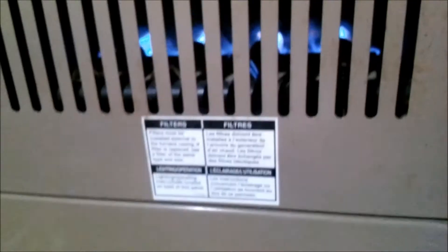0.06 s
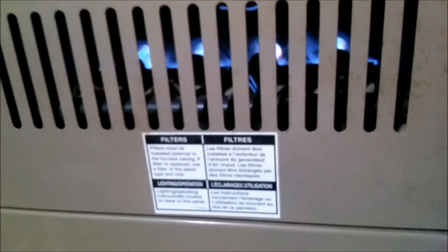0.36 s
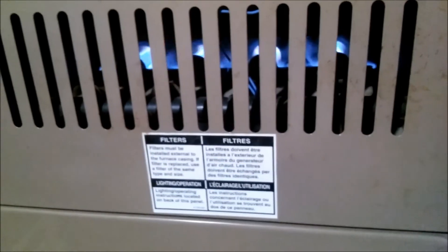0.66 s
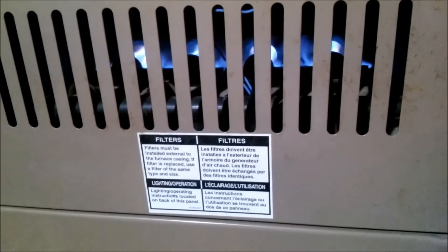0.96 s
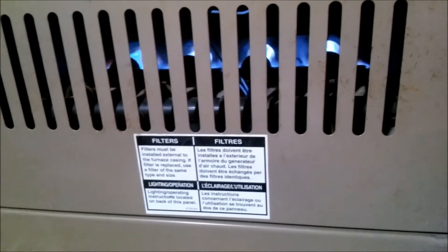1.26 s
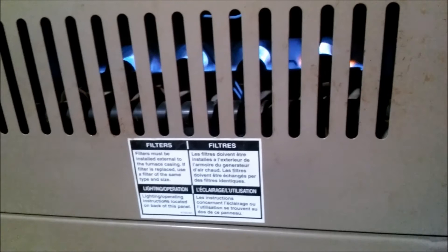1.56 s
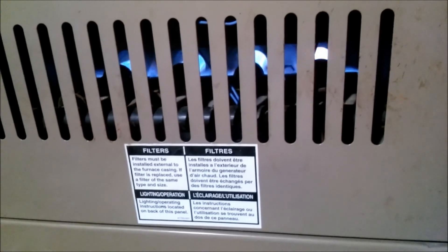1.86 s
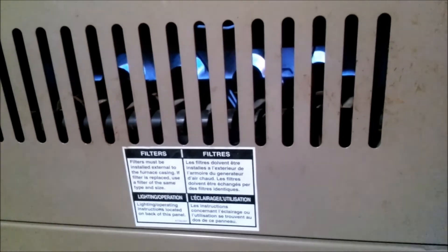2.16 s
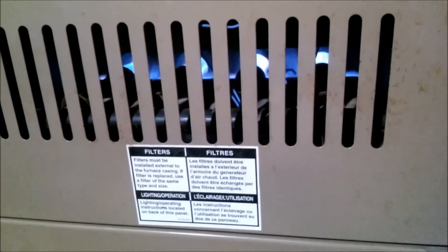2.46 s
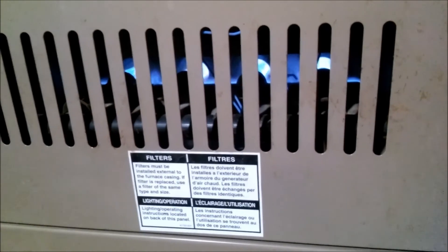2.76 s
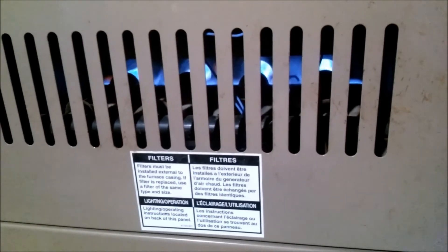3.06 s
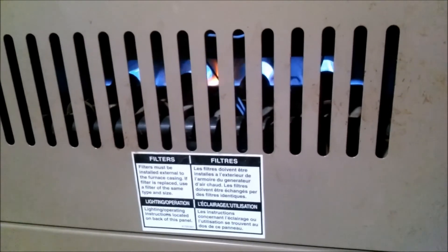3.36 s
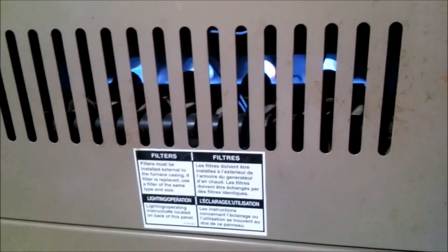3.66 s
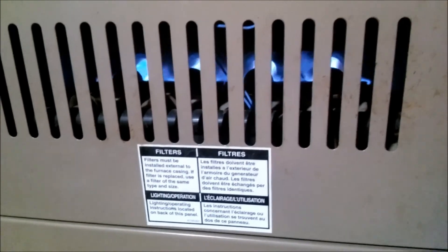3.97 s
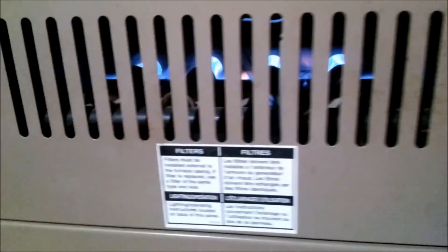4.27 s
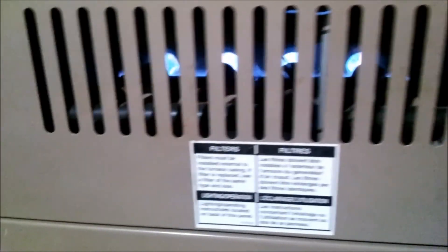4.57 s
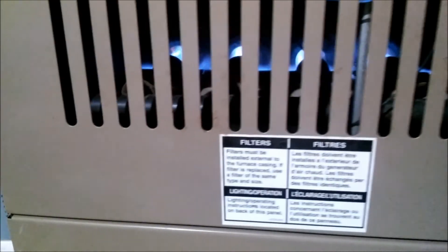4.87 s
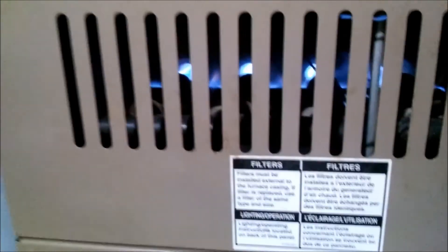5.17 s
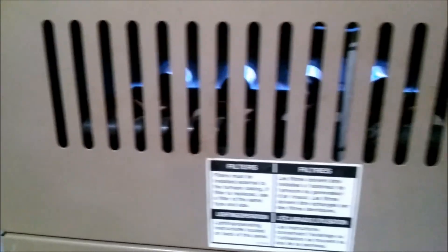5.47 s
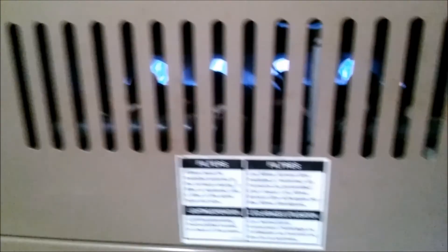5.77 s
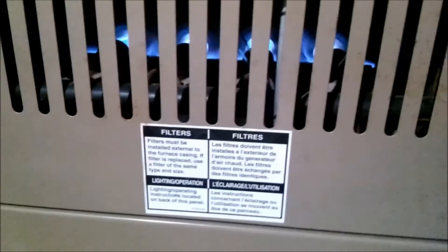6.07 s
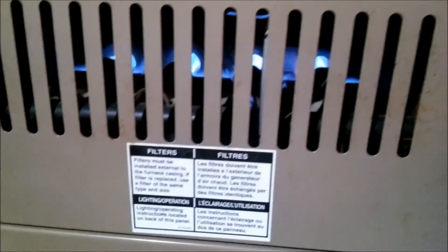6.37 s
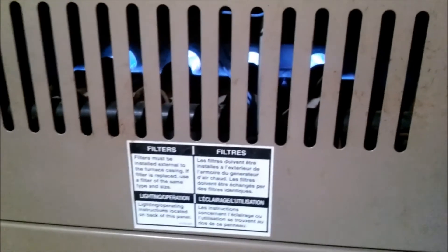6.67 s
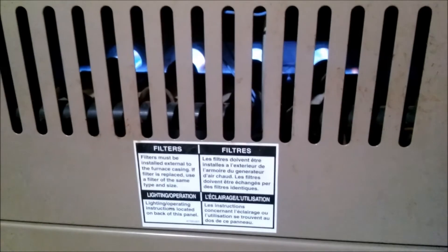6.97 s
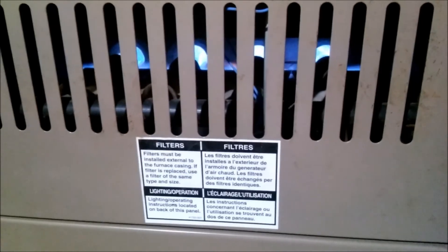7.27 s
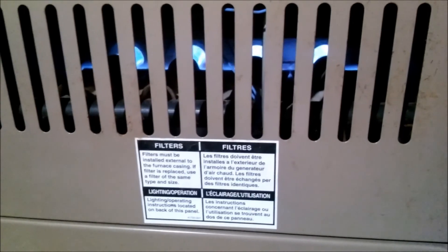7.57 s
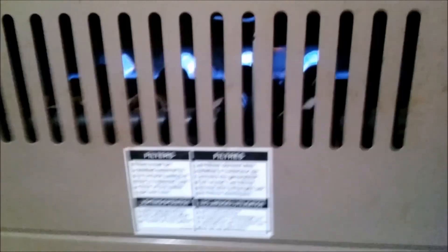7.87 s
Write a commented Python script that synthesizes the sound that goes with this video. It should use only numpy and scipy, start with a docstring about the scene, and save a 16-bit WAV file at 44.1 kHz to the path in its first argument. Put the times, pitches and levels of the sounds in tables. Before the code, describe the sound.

A gas furnace burns close by, its flames rumbling and surging under a humming, whining fan and hissing jets.

```python
"""The sound opens abruptly, loud and full, with broadband noise, then soon thins.
A gas furnace burns close by, behind a louvred steel door. The flames rumble and surge, the gas jets
hiss, air rings the cabinet's resonances, and the draught fan's induction motor hums, whines and throbs
as the listener shifts about. After a brief sizzle and faint clicks a thin whistle stands out;
with two sharp clicks the sound stops."""
import sys
import numpy as np
from scipy import signal
from scipy.fft import rfft, irfft, next_fast_len
from scipy.io import wavfile
from scipy.ndimage import uniform_filter1d

SR = 44100
rng = np.random.default_rng(int(sys.argv[2]) if len(sys.argv) > 2 else 0)


def wrap_up_sound(samples):
    """Save the sound to the file named by the first command line argument, as 16-bit audio."""
    columns = np.atleast_2d(samples).T
    # keep every value between -1 and 1, then stretch to whole-number steps
    tamed = np.clip(columns, -1, 1)
    steps = np.round(tamed * 32767).astype(np.int16)
    wavfile.write(sys.argv[1], SR, steps)


N = 353020
TIME = np.arange(N) / SR
SIZE = next_fast_len(N, True)
FREQ = np.maximum(np.arange(SIZE // 2 + 1) * SR / SIZE, 1)

SHAFT_HZ, PULL_HZ = 55.585, 120   # the field pulls on the motor at twice the mains frequency
OPENING_END_S, OPENING_FADE_S = 1.182, 0.12   # the fuller opening falls back
TAKEOVER_S, TAKEOVER_RISE_S = 5.76, 0.21   # the thin whistle takes over from whine and hiss

# Spectral shapes of the noises: frequency_hz, relative_db
OPENING_SPECTRUM = [(150, -25), (260, -1), (380, 11), (560, -14), (1100, 3), (1800, -1), (3200, -2.5),
                    (3800, -7.5), (5200, -9), (6400, -1.5), (7200, -19.5), (10000, -29.5)]
RUMBLE_SPECTRUM = [(20, -41), (36, -36.5), (46, -20.5), (56, -6.5), (66, 1.5), (76, 12.5), (88, 5),
                   (108, 14), (130, 10), (155, -7), (200, -34)]
ROAR_SPECTRUM = [(120, -20), (167, -1.5), (200, -3.5), (240, 3), (310, -3.5), (370, -18), (600, -36.5)]
DRAUGHT_SPECTRUM = [(330, -3), (400, -1), (600, -2.5), (850, 1.5), (1000, -11.5), (1150, -15), (1750, -13),
                    (2700, -14), (3200, -15), (3550, -23), (5000, -22)]
JET_SPECTRUM = [(1200, -1.5), (3000, -4), (3600, -6), (4300, -5), (5300, -15), (6000, 2.5), (6500, 8.5),
                (7200, -1), (7800, 3.5), (8500, -4.5), (9400, -2.5), (10300, -11), (11000, -30)]
JET_TOP_SPECTRUM = [(9000, -4), (10200, 1.5), (11000, 2), (11700, 5), (12600, -0.5), (14000, -2),
                    (15700, -2)]
SIZZLE_SPECTRUM = [(3900, -19), (4250, 5), (4700, -9), (5400, 0), (5950, -1), (6200, -16), (7000, -16),
                   (7600, -2), (8600, -18), (9400, -1), (9900, -24)]
CLICK_SPECTRUM = [(300, -12), (2000, 5), (4800, 9), (7000, 0), (12000, -3), (15000, -3.5)]

# Strength of the fire between surges: time_s, relative_db
FIRE_STRENGTH = [(1.4, -37), (1.75, -38.5), (2.3, -40.5), (2.55, -40), (3.45, -37.5), (4.0, -32.5),
                 (4.6, -35), (5.35, -33), (5.9, -34.5), (6.2, -35), (6.8, -34.5), (7.15, -39.5), (7.6, -35)]
# Surges of the flames: time_s, relative_peak_db
FLAME_SURGES = [(1.719, -28), (2.443, -24.5), (2.612, -23.5), (2.801, -23.5), (2.965, -24.5), (3.224, -28),
                (3.549, -27.5), (3.734, -28), (3.837, -26), (4.42, -24.5), (4.643, -29), (4.873, -25),
                (5.292, -24.5), (6.111, -20.5), (7.4, -22.5), (7.6, -23.5)]
# Harmonics of the fan's hum: shaft_multiple, rms_db
SHAFT_HARMONICS = [(3, -52.5), (5, -54), (6, -50), (7, -60), (8, -67.5), (9, -64), (10, -61.5), (11, -58.5),
                   (15, -61), (16, -59.5), (19, -68), (20, -75)]
# Tones lying PULL_HZ above a shaft harmonic: shaft_multiple, rms_db
SIDEBANDS = [(13, -66.5), (15, -68), (16, -60.5), (17, -62.5), (18, -77.5), (19, -70.5)]
# Panel modes in the whine: centre_hz, width_hz, scrape_db, clean_db, throb_depth, throb_delay_s, side_db
PANEL_MODES = [(2015, 220, 3, -7, 0.069, 0, -11), (2084, 85, 1, 0, 0.55, 0.017, -9),
               (2239, 97, -2.5, -14.5, .9, -0.0089, 6.5), (2280, 82, -7, -10.5, 1.1, -0.013, 11),
               (2378, 68, -9.5, -19, 1.2, 0.011, 9.5), (2400, 77, -26, -17, 1.8, 0.0013, 15.5),
               (2551, 92, -13.5, -14.5, 1.6, -0.002, 18.5), (2610, 64, -7, -6, 0.79, 0.00041, 2)]
# Strength of the draught: time_s, relative_db
DRAUGHT_STRENGTH = [(1.4, -44.5), (2.1, -45), (2.55, -45), (3.1, -44), (3.35, -40), (4.05, -40.5),
                    (4.3, -41.5), (5.0, -39), (5.3, -38.5), (5.85, -42.5), (6.2, -42), (6.5, -43.5),
                    (6.9, -42), (7.2, -43.5), (7.45, -41.5), (7.85, -41.5)]
# Peaks and dips set by the cabinet's hollows: centre_hz, width_hz, gain_db
CABINET_RESPONSE = [(363, 38, -11.5), (415, 24, 8.5), (507, 82, -5.5), (600, 50, 6), (686, 38, -6),
                    (790, 87, 1.5), (942, 56, -16)]
# The four whistling resonances: centre_hz, width_hz
WHISTLE_MODES = [(1480, 140), (2930, 190), (4560, 420), (5950, 420)]
# Resonances that rise with the third whistle: centre_hz, width_hz, gain_db
COMPANION_MODES = [(3150, 130, -15.5), (3270, 84, -13.5), (7760, 920, -24.5), (9630, 980, -32)]
# Jet noise that gets past the louvres: time_s, relative_db
JET_TRANSMISSION = [(0.6, -65), (4.15, -64), (4.37, -72.5), (5.15, -75.5), (5.27, -65.5), (5.75, -68.5),
                    (5.79, -62), (6.03, -68), (7.8, -73.5)]
# Spits of the jets: centre_s, half_width_s, rise_db
JET_SPITS = [(5.812, 0.069, 2.5), (7.63, .06, 13)]
# Small dry clicks: start_s, relative_db
DRY_CLICKS = [(5.249, -39), (5.782, -31), (7.862, -36), (7.883, -12.5), (7.889, -11)]
# The listener's shift towards the cabinet's side: time_s, side_share
LISTENER_SHIFT = [(3.3, 0.12), (4.25, 0.28), (4.6, 0.3), (5.0, 0.95), (6.2, 0.82), (6.6, .55), (7.8, 0.2)]
# Level rules of the layers: usual_db, control_share, opening_db, side_db, step_db, trend_db_per_s
RUMBLE_RULE = (-39, 1, 9.5, 2, 1.5, 0)
ROAR_RULE = (-40.5, 0.64, 9.5, -1, 0, -0.5)
BLADE_RULE = (-49, 1.07, 9, 1.5, -0.5, -1.5)
WHINE_RULE = (-45.5, 0.54, 9, 3.5, -11, 3.3)
DRAUGHT_RULE = (-44.5, 1.19, 8, 1, 1, 0)
WHISTLE_RULES = [(-52.5, 0.6, 3, -5, -7.5, 0), (-54, 1.2, 12, 0, 13, -4.5), (-61, .6, 15, 3, 17.5, -.5),
                 (-55.5, 0.26, 8.3, 6.5, -13, 5)]   # one row a whistle, lowest first
HISS_RULE = (-51.5, 0.6, -0.5, 0.5, -4.5, -4.5)


def from_db(db):
    """Amplitude grows tenfold for every 20 dB."""
    return 10 ** (np.asarray(db) / 20)


def unit_rms(x):
    """Normalisation to unit mean power."""
    return x / np.sqrt(np.mean(x ** 2) + 1e-20)


def curve(points):
    """Linear interpolation of a control over time."""
    return np.interp(TIME, *np.transpose(points))


def swing(points):
    """Deviation of a level curve from its mean, in dB."""
    db = curve(points)
    return db - db.mean()


def colour(points):
    """Band-pass response through the points, falling 24 dB an octave beyond its ends."""
    hz, db = np.transpose(points)
    skirts = np.minimum(FREQ / hz[0], 1) * np.minimum(hz[-1] / FREQ, 1)
    return from_db(np.interp(np.log(FREQ), np.log(hz), db)) * skirts ** 4


def resonance(hz, width_hz):
    """Lorentzian peak of height 1, with its width taken at half height."""
    return 1 / (1 + (2 * (FREQ - hz) / width_hz) ** 2)


def noise(response):
    """Spectral shaping of white noise, at rms 1."""
    spectrum = rfft(rng.standard_normal(SIZE)) * response
    return unit_rms(irfft(spectrum, SIZE)[:N])


def drift(corner_hz, count=4096):
    """Random fluctuation of rms 1: noise low-passed at corner_hz."""
    hz = np.arange(count // 2 + 1) * SR / N
    slow = irfft(rfft(rng.standard_normal(count)) / (1 + (hz / corner_hz) ** 2))
    return np.interp(np.arange(N) * count / N, np.arange(count), unit_rms(slow))


def evened(x, span_s):
    """Division by the running rms removes slow swells and leaves the fast grain."""
    return x / np.sqrt(uniform_filter1d(x ** 2, int(span_s * SR)) + 1e-9)


def tone(cycles, rms_db):
    """Simple harmonic motion with a random starting phase."""
    return np.sqrt(2) * from_db(rms_db) * np.sin(2 * np.pi * (cycles + rng.random()))


def level(rule, control_db):
    """Gains add in dB: a layer's control, the fuller opening, the listener's shift and the takeover."""
    usual_db, share, opening_db, side_db, step_db, trend_db_per_s = rule
    side = curve(LISTENER_SHIFT)
    opening = 1 - np.clip((TIME - OPENING_END_S) / OPENING_FADE_S, 0, 1)
    takeover = np.clip((TIME - TAKEOVER_S) / TAKEOVER_RISE_S, 0, 1)
    late_db = step_db + trend_db_per_s * (TIME - TAKEOVER_S)
    return usual_db + share * control_db + opening_db * opening + side_db * side + late_db * takeover


def opening_noise(level_db=-37, fade_s=(1.2, 1.414)):
    """Broadband noise fills out the opening, then fades linearly."""
    return noise(colour(OPENING_SPECTRUM)) * from_db(level_db) * np.interp(TIME, fade_s, [1, 0])


def flames(rumble_surge_db=-5.5, roar_surge_db=-15, flutter_hz=14, lowest_hz=36):
    """Combustion noise: a low rumble and a roar above it surge and flutter with the flame fronts."""
    fire_db, surge = swing(FIRE_STRENGTH), surge_envelope()
    rumble_db = level(RUMBLE_RULE, fire_db) + 2.5 * drift(flutter_hz)
    roar_db = level(ROAR_RULE, fire_db) + 1.5 * drift(flutter_hz)
    # steady burning and surges add in power
    rumble_gain = np.hypot(from_db(rumble_db), surge * from_db(rumble_surge_db))
    roar_gain = np.hypot(from_db(roar_db), surge * from_db(roar_surge_db))
    rumble = evened(noise(colour(RUMBLE_SPECTRUM)), span_s=0.055) * rumble_gain
    roar = evened(noise(colour(ROAR_SPECTRUM)), span_s=0.14) * roar_gain
    shared_flutter = from_db(2.5 * drift(25))
    high_pass = signal.butter(4, lowest_hz, "high", fs=SR, output="sos")
    return signal.sosfilt(high_pass, (rumble + roar) * shared_flutter)


def surge_envelope(attack_s=0.021, hold_s=0.018, release_s=0.098):
    """Superposed envelopes: each surge of the flames swells quickly, holds and sinks back."""
    corners_s = [-attack_s, 0, hold_s, hold_s + release_s]
    return sum(from_db(db) * np.interp(TIME - s, corners_s, [0, 1, 1, 0]) for s, db in FLAME_SURGES)


def fan(turns, blade_db, blade_count=17, mains_db=-50, waver_db=3, jitter_cycles=0.067):
    """Periodic forcing gives shaft harmonics, their sidebands, the blade-passing tone and mains hum."""
    pulls = PULL_HZ * TIME
    hum = sum(tone(k * turns, db + waver_db * drift(9.9)) for k, db in SHAFT_HARMONICS)
    buzz = sum(tone(k * turns + pulls, db + waver_db * drift(3.6)) for k, db in SIDEBANDS)
    # eddies reaching the blades shake the timing and level of their tone
    blades = tone(blade_count * turns + jitter_cycles * drift(25), blade_db + waver_db * drift(22))
    return hum + buzz + blades + tone(pulls, mains_db)


def motor_whine(turns, level_db, jitter_cycles=0.1, swell_db=1.8, scrape_throb_share=0.4):
    """Forced vibration: the bearing scrapes each panel mode, which sings at its nearest shaft harmonic."""
    side = curve(LISTENER_SHIFT)
    whine = 0
    for hz, width_hz, scrape_db, clean_db, depth, delay_s, side_db in PANEL_MODES:
        cycles = round(hz / SHAFT_HZ) * turns + jitter_cycles * drift(10)
        clean = tone(cycles, clean_db - 0.5 * drift(7)) * throb(depth, delay_s)
        scrape = noise(resonance(hz, width_hz)) * from_db(scrape_db)
        scrape *= throb(scrape_throb_share * depth, delay_s)
        whine += (clean + scrape) * from_db(side_db * side)
    return evened(whine, span_s=0.51) * from_db(level_db + swell_db * drift(11))


def throb(depth, delay_s=0):
    """Beating: the rotor slips behind the field, and the two line up about nine times a second."""
    beat_hz = PULL_HZ - 2 * SHAFT_HZ
    return unit_rms(np.exp(depth * np.cos(2 * np.pi * beat_hz * (TIME - delay_s))))


def draught(level_db, flutter_db=2.5):
    """Turbulence in the air passing the burners is filtered by the hollows of the cabinet."""
    hollows = from_db(sum(db * resonance(hz, width_hz) for hz, width_hz, db in CABINET_RESPONSE))
    return noise(colour(DRAUGHT_SPECTRUM) * hollows) * from_db(level_db + flutter_db * drift(22))


def whistles(flow_db, waver_db=1.5, flare_s=7.825, flare_db=12, flare_decay_s=0.035):
    """Air excites four narrow resonances; the second pulses with the motor, the third flares once."""
    responses = [resonance(hz, width_hz) for hz, width_hz in WHISTLE_MODES]
    third_hz, third_width_hz = WHISTLE_MODES[2]
    responses[2] /= 1 + ((FREQ - third_hz) / third_width_hz) ** 4 / 10   # steeper skirts
    responses[2] += sum(from_db(db) * resonance(hz, width_hz) for hz, width_hz, db in COMPANION_MODES)
    first, second, third, fourth = [
        noise(response) * from_db(level(rule, flow_db) + waver_db * drift(16))
        for response, rule in zip(responses, WHISTLE_RULES)]
    flare = from_db(flare_db * decay(flare_s, flare_decay_s))
    return first + second * throb(depth=0.18) + third * flare + fourth


def decay(start_s, decay_s):
    """Exponential decay after a sudden step to 1."""
    return (TIME >= start_s) * np.exp(-np.abs(TIME - start_s) / decay_s)


def gas_jets(top_gain_db=1.5, top_spit_share=0.4):
    """Jet noise: the orifices hiss and spit; the airy top is beamed, so the louvres shade it more."""
    spit_db = sum(db * np.exp(-((TIME - s) / half_width_s) ** 2) for s, half_width_s, db in JET_SPITS)
    hiss_db = level(HISS_RULE, swing(JET_TRANSMISSION)) + spit_db
    top_db = curve(JET_TRANSMISSION) + top_gain_db + top_spit_share * spit_db
    hiss = noise(colour(JET_SPECTRUM)) * from_db(hiss_db)
    return hiss + noise(colour(JET_TOP_SPECTRUM)) * from_db(top_db)


def sizzle(start_s=5.22, end_s=5.86, ramp_s=0.042, level_db=-54.5):
    """Narrow spectral peaks give the jets a brighter, whistly hiss for a moment."""
    return noise(colour(SIZZLE_SPECTRUM)) * gate(start_s, end_s, ramp_s) * from_db(level_db)


def gate(start_s, end_s, ramp_s):
    """Trapezoidal envelope: rise, hold at 1, fall."""
    return np.clip(np.minimum(TIME - start_s, end_s - TIME) / ramp_s, 0, 1)


def clicks(decay_s=0.0014, gain_db=-6):
    """Broadband transients: each bright burst dies within a few milliseconds."""
    bursts = sum(from_db(db) * decay(s, decay_s) for s, db in DRY_CLICKS)
    return noise(colour(CLICK_SPECTRUM)) * bursts * from_db(gain_db)


def scene():
    """Superposition of all the sources in one channel."""
    flow_db = swing(DRAUGHT_STRENGTH)
    turns = SHAFT_HZ * TIME + 0.015 * drift(0.28)   # the shaft speed wanders very slightly
    machine = fan(turns, level(BLADE_RULE, flow_db)) + motor_whine(turns, level(WHINE_RULE, flow_db))
    air = draught(level(DRAUGHT_RULE, flow_db)) + whistles(flow_db)
    return (opening_noise() + flames() + machine + air + gas_jets() + sizzle() + clicks())[None]


def record(dry, start_s=0.5745, stop_s=7.8905, cutoff_hz=15800):
    """Gating and band limiting: the sound starts and stops within a millisecond, and its top is cut."""
    low_pass = signal.ellip(10, 0.1, 90, cutoff_hz, fs=SR, output="sos")
    return signal.sosfilt(low_pass, dry * gate(start_s, stop_s, ramp_s=0.001))


dry = scene()
out = record(dry)
wrap_up_sound(out)
```